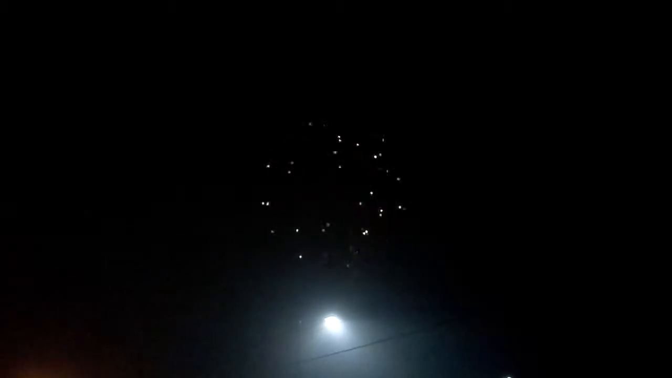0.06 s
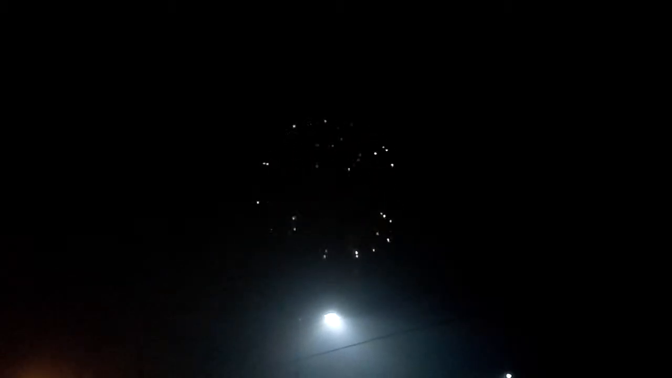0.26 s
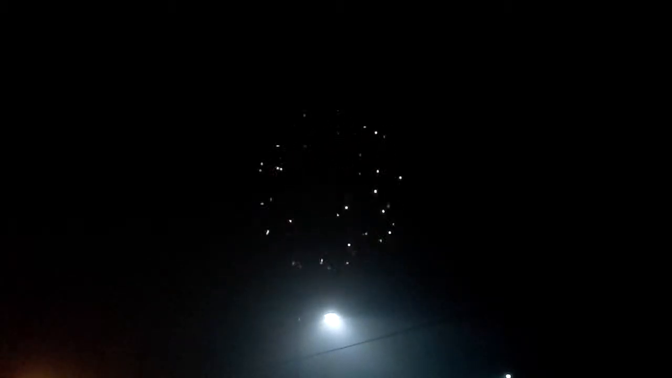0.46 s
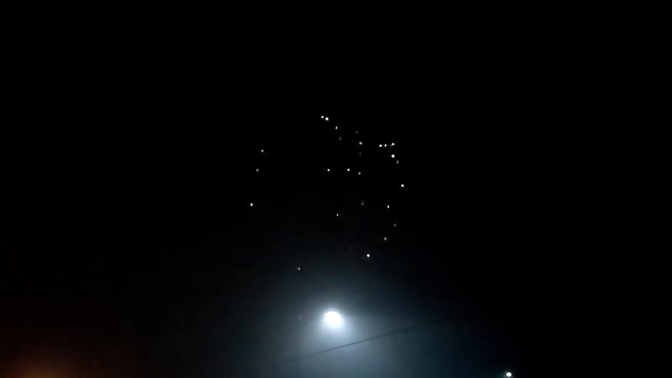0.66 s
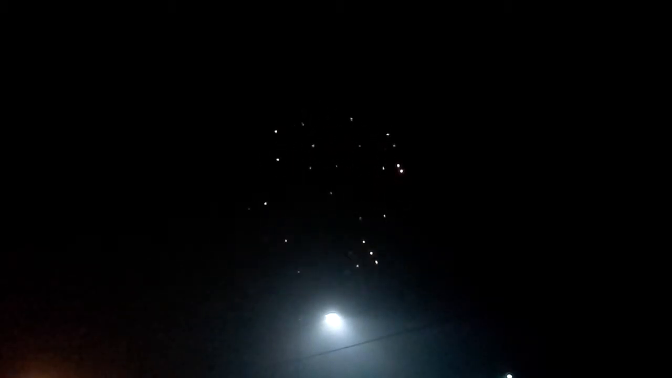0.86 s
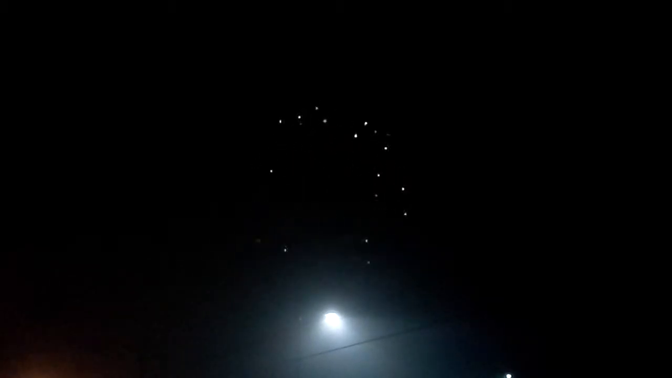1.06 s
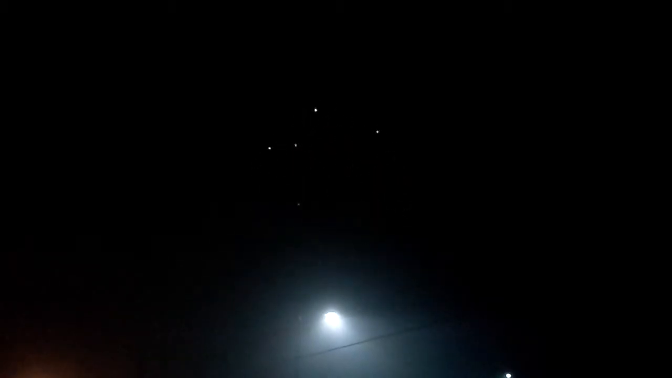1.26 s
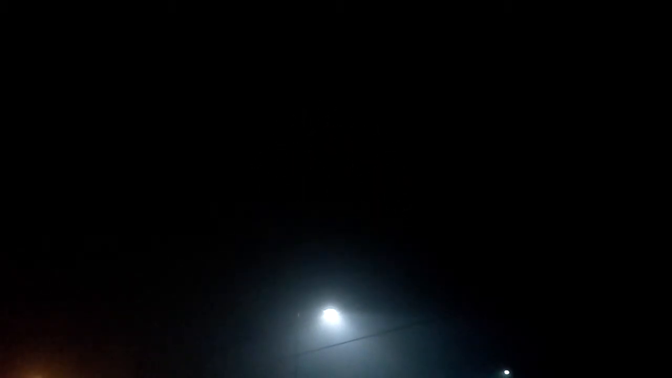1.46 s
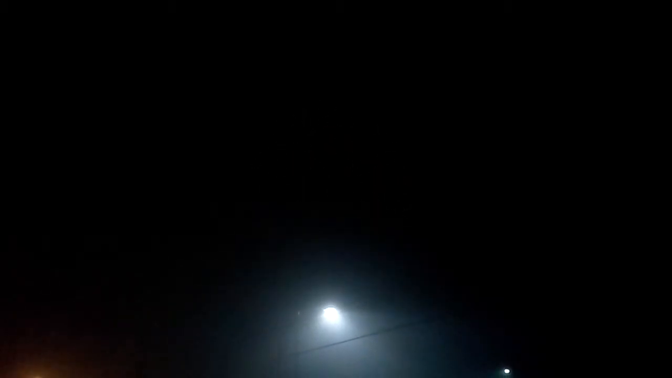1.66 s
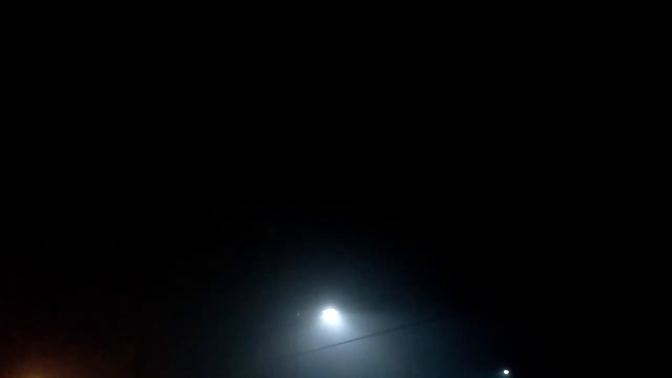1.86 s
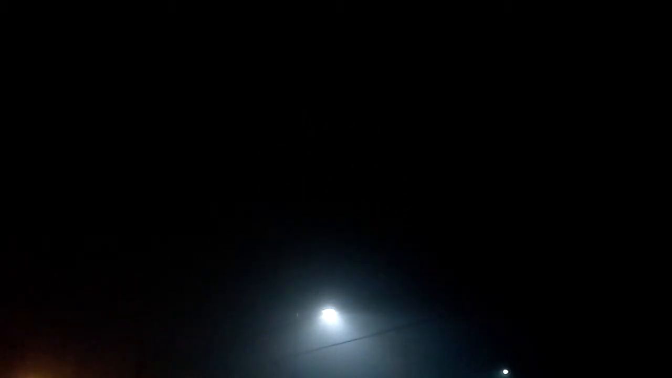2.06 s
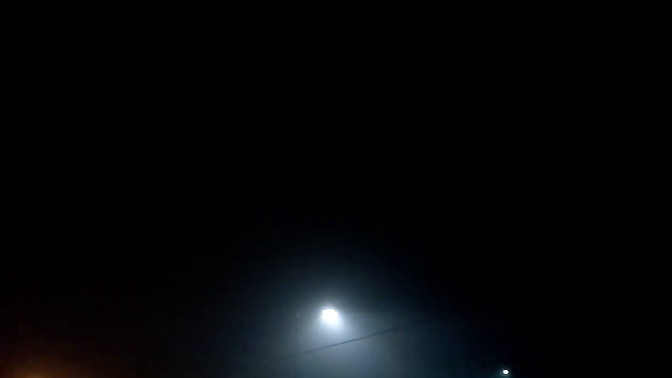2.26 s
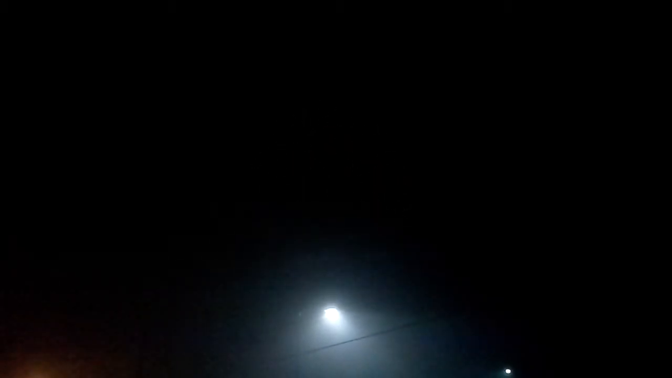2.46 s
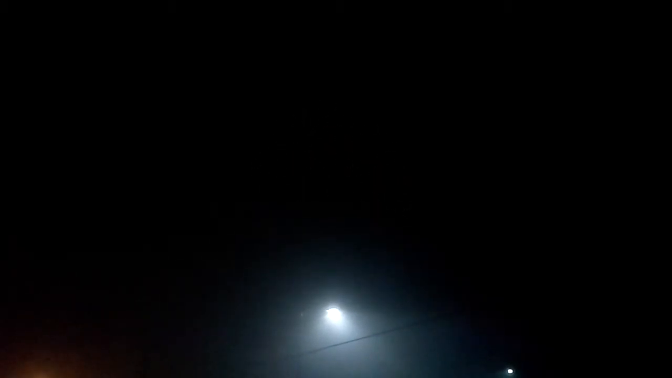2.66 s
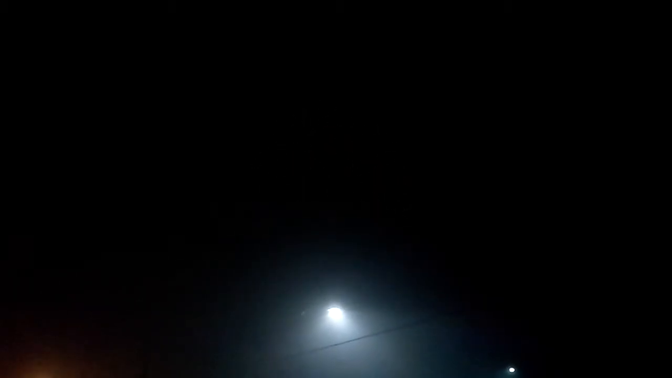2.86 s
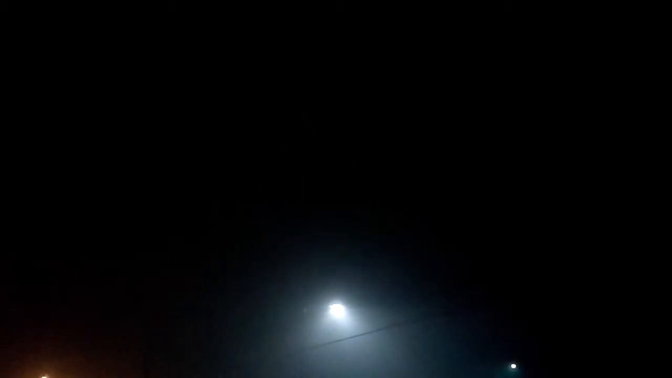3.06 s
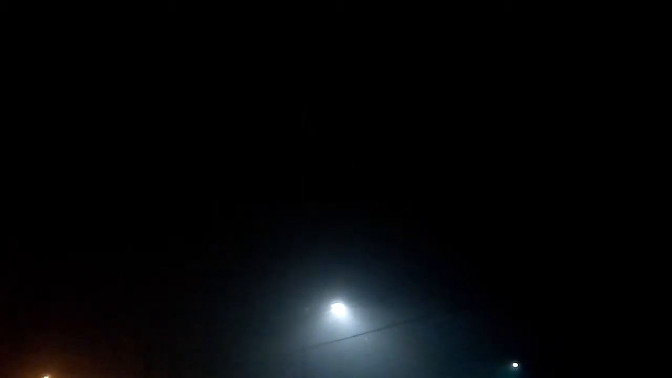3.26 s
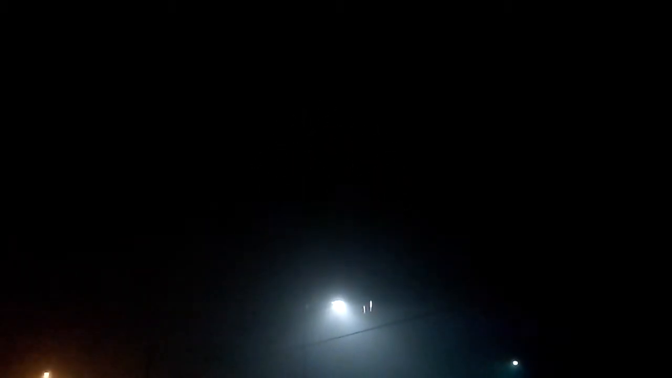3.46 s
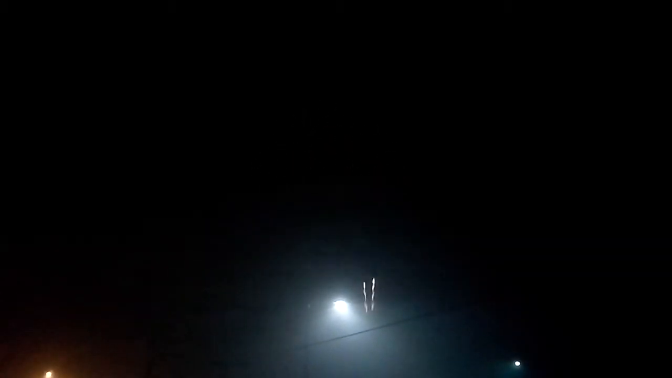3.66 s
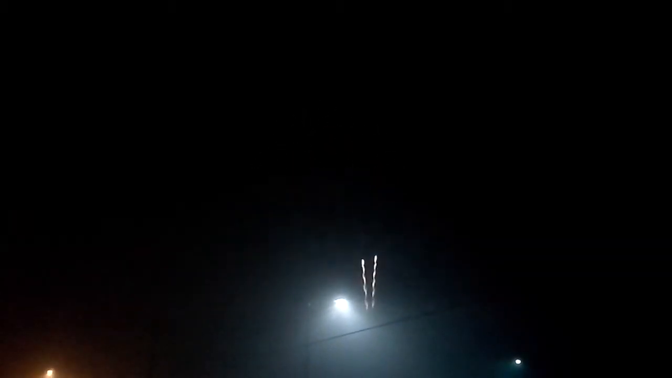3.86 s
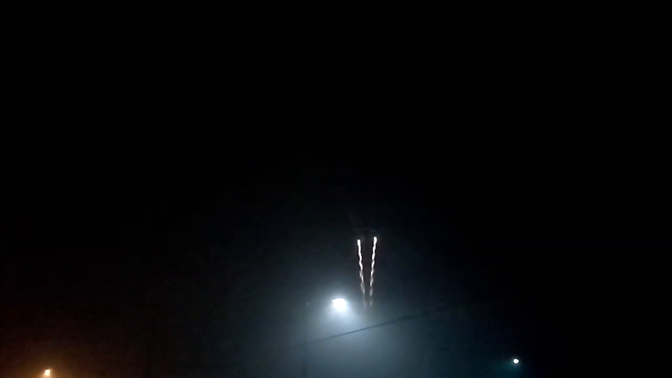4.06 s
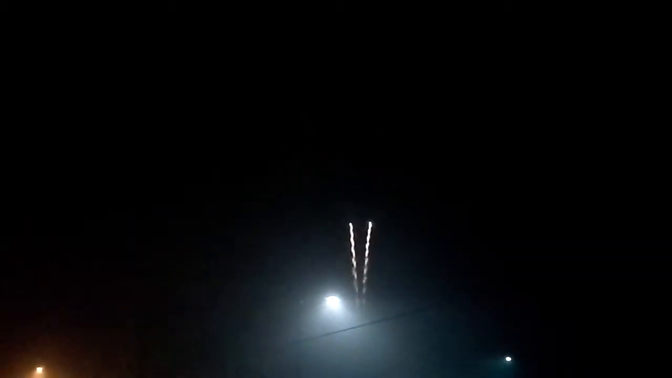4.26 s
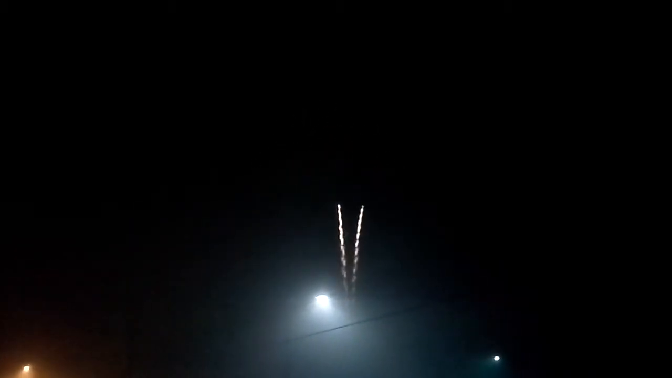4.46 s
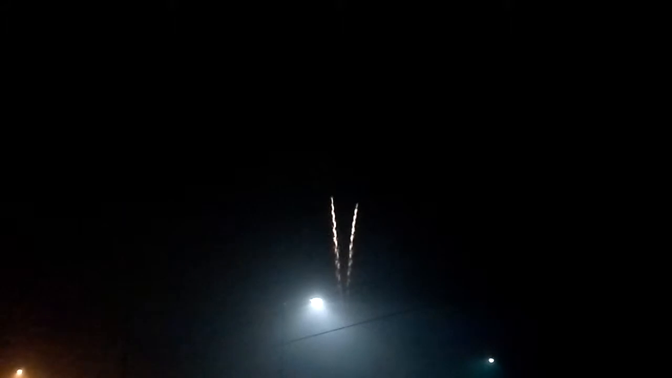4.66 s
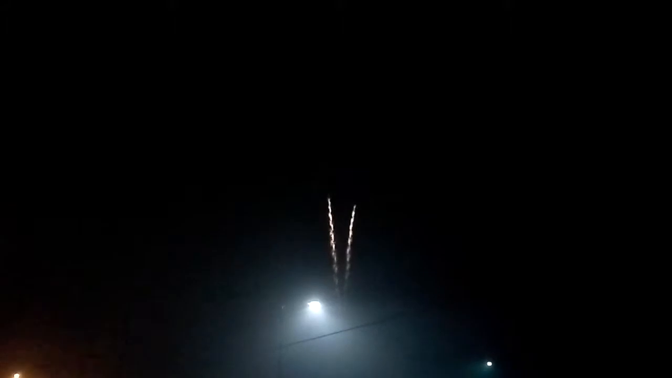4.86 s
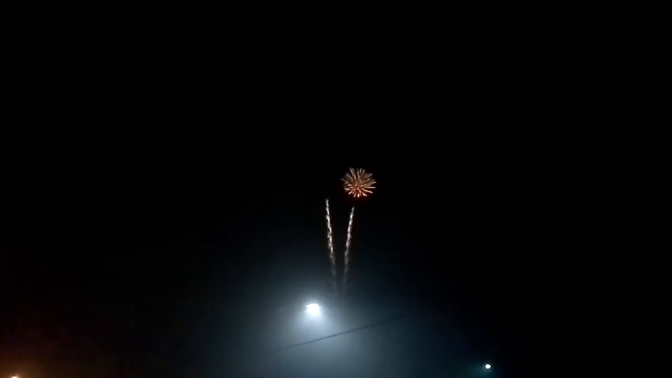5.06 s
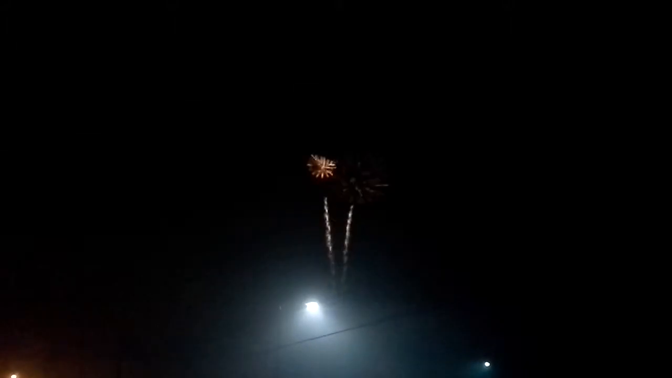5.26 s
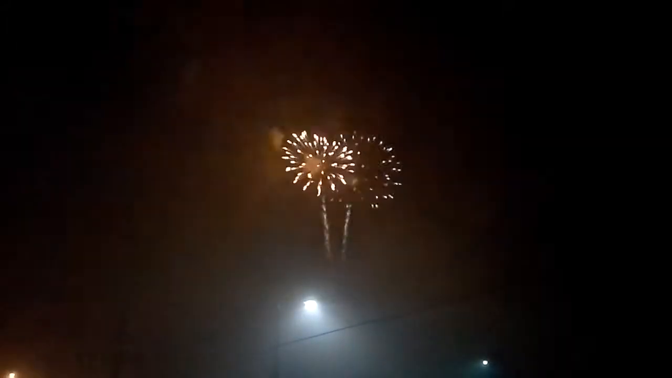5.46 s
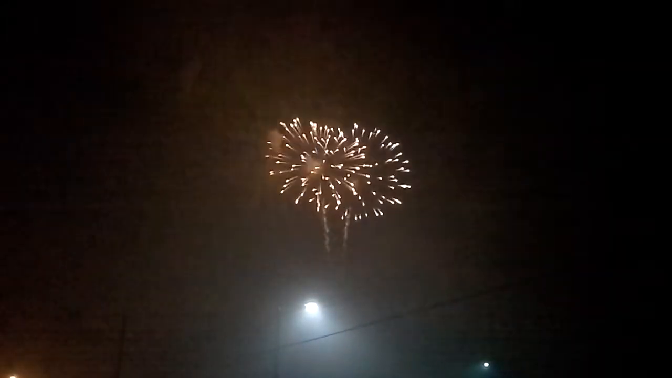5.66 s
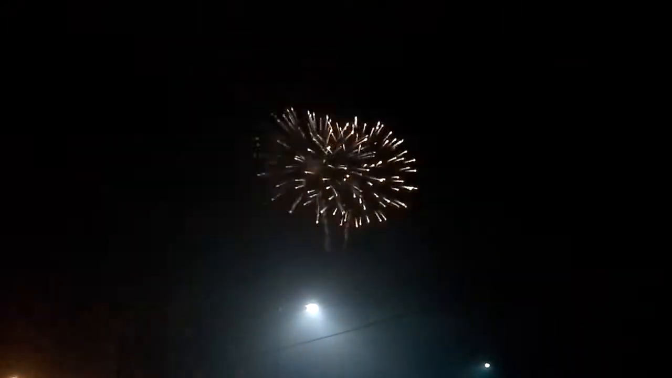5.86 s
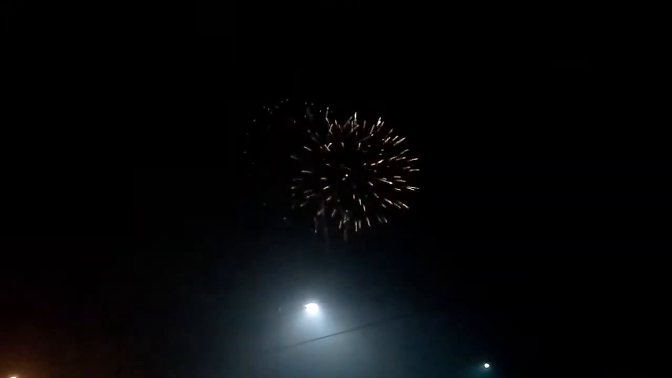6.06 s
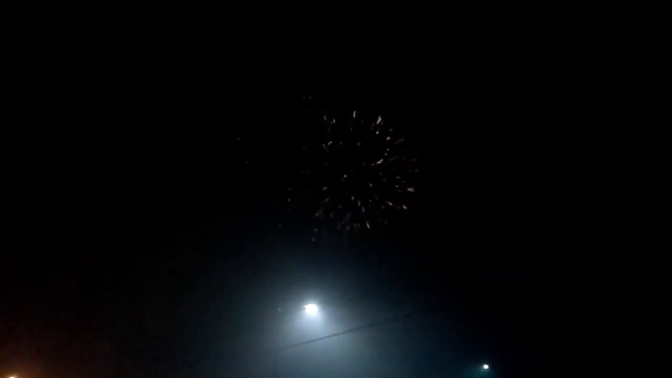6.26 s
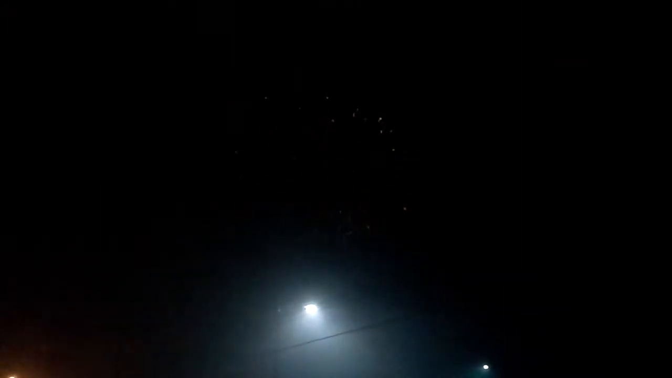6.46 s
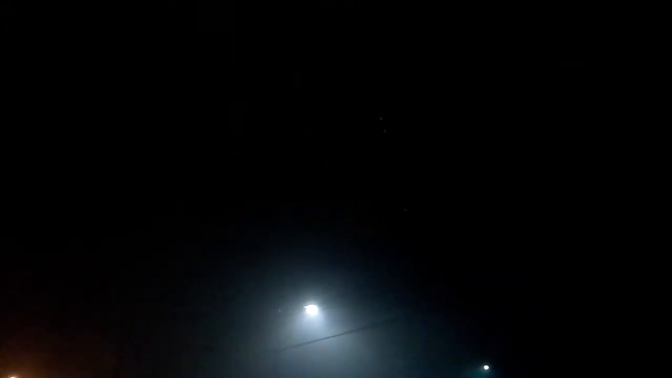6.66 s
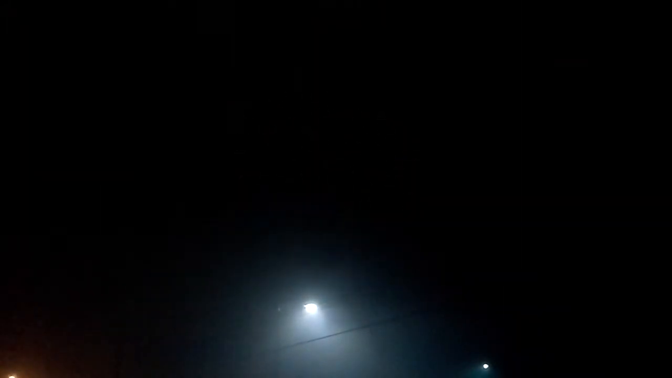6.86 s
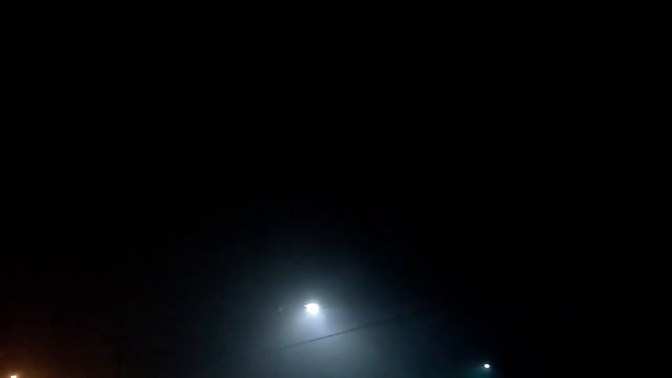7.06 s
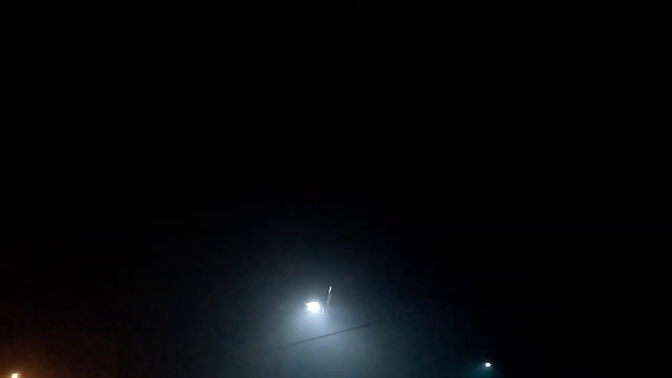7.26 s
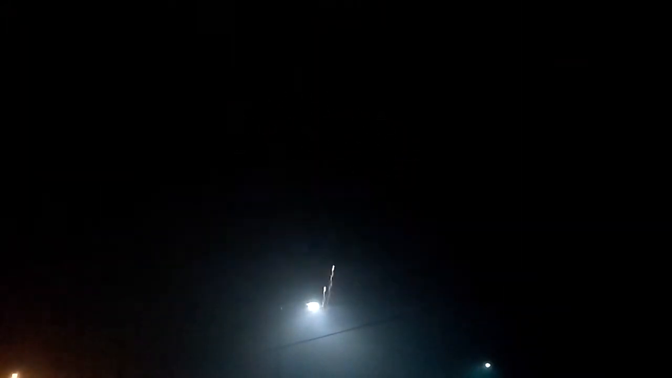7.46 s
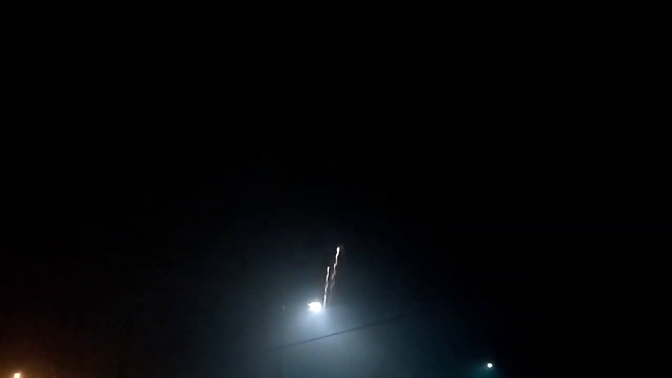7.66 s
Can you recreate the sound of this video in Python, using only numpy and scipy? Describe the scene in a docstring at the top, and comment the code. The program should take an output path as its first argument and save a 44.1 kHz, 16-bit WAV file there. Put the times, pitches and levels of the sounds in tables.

```python
"""Fireworks at night over houses, loud enough to overload one small microphone.
An earlier shell's glitter sizzles out among far shells' booms. Mortars (launch tubes) thump and ring
as their charges fire, and two shells burst overhead, each with a sharp jump in air pressure.
Houses scatter each bang, buildings slap it back, and the echoes roll on far away.
In the lulls, crickets and katydids sing by rubbing their wings."""
import sys
import numpy as np
from scipy import signal
from scipy.fft import rfft, irfft, next_fast_len
from scipy.io import wavfile
from scipy.ndimage import uniform_filter1d

SR = 44100
rng = np.random.default_rng(int(sys.argv[2]) if len(sys.argv) > 2 else 0)


def int16_out(signal):
    """Quantize to a 16-bit WAV file."""
    q = np.round(np.clip(np.atleast_2d(signal).T, -1, 1) * 32767)
    wavfile.write(sys.argv[1], SR, q.astype(np.int16))


N = 340011
TIME = np.arange(N) / SR

# Shells bursting: t/s, blast/dB, scatter off near houses/dB, echo tail/dB, factor on the tail's length
BURSTS = [(5.7196, 20.5, -8.5, -14, 1.69), (5.981, 20.5, -8, -8.5, 0.63)]
# Notes that hang between houses: f/Hz, level over the tail/dB, t60/s (the time to fade by 60 dB)
HOUSE_TONES = [(217, -2, 0.68), (279, -8.5, 0.63), (367, -7, 0.61)]
# Mortars firing: t/s, pulse/dB, pulse width/ms, share kept per bounce, hollow ring/dB, bright ring/dB,
# thump/dB, leak/dB, wall delay/s, wall echo/dB, scatter/dB, echo tail/dB,
# low overtone/Hz, its level/dB, high overtone/Hz, its level/dB, whistle/Hz, its level/dB
LAUNCHES = [(3.4197, -5, 0.14, 0.6, -5, -12, -10, -7.5, 0.013, -5, -11, -15.5, 1550, -31, 2270, -12, 4730, -17),
            (7.0806, -3.5, .14, 0.23, -9.5, -48, -12, -24, .0175, -11, -12.5, -20.5, 1650, -17, 2370, -17, 4300, -23),
            (7.1703, -3, 0.21, 0.8, -3.5, -45, -12.5, -12, .0055, -15, -13, -25.5, 1430, -16, 2290, -14, 4520, -15.5),
            (7.6272, -0.5, 0.15, 0.084, -40, -46, -11, -18, 0.0095, -2.5, -17, -25.5, 1380, -12.5, 2380, -17, 4590, -17)]
# Smeared echoes off buildings: delay/s, level/dB, f/Hz, width/octaves, t60/s
BURST_SLAPS = [(0.027, -18.5, 4630, 0.2, 0.09), (.028, -16, 794, 0.52, 0.078), (.035, -18, 265, 0.12, 0.32),
               (.095, -23, 4530, 0.11, 0.48), (.14, -27, 4650, .09, .2), (.79, -29, 627, 0.091, .19)]
LAUNCH_SLAPS = [(.085, -26.5, 864, 0.12, 1.5), (.224, -23.5, 135, 0.3, 0.13), (.366, -29.5, 810, 0.27, 0.8),
                (0.379, -28, 3400, .05, 0.043), (0.634, -31, 1900, 0.4, .11), (0.705, -18, 1650, .2, .035),
                (.719, -17, 1650, 0.19, 0.041)]  # levels count from the launch's pulse
# Flat walls that send a burst back as a knock: delay/s, level/dB, f/Hz, half length/s
WALL_KNOCKS = [(0.057, -16, 295, 0.019), (.08, -12, 225, 0.0061), (0.164, -11.5, 383, 0.0049),
               (.197, -14.5, 227, .012), (.251, -13, 255, .011), (0.289, -16, 216, 0.0094)]
# Booms and pops of far shells, and lone echoes of the launches and bursts:
# t/s, level/dB, f/Hz, t60 of the grumble/s
BOOMS_AND_ECHOES = [(.001, -8.5, 300, 0.064), (.002, -11.5, 755, .15), (0.042, -21, 1490, 0.082),
                    (0.099, -22, 115, .1), (.238, -13.5, 128, .1), (.399, -14, 310, 0.063),
                    (0.485, -23, 280, 0.18), (.505, -18.5, 790, 0.15), (0.653, -10.5, 125, 0.23),
                    (.656, -18, 424, 0.42), (.73, -24, 700, 0.28), (0.761, -17, 130, .08),
                    (.925, -18.5, 112, 0.062), (2.372, -15, 281, 0.065), (2.752, -16.5, 286, 0.053),
                    (3.04, -17.5, 264, 0.065), (3.436, -16.5, 137, .15), (3.665, -26.5, 1150, 0.51),
                    (3.78, -29, 3300, 0.49), (3.805, -24, 740, 0.2), (6.333, -15, 270, 0.22),
                    (6.52, -18, 248, 0.21), (6.865, -20, 285, 0.68), (7.035, -16.5, 280, 0.23),
                    (7.159, -15, 260, 0.27), (7.375, -13.5, 290, .09)]
# How long echoes last at each pitch, before each bang's own length factor: f/Hz, t60/s
STREET_DECAY = [(80, 1.75), (230, 1.94), (700, 0.92), (2000, 1), (4600, 1.44), (9000, 0.91), (15000, 0.3)]
ROLL_DECAY = [(80, 18), (170, 19), (280, 16.1), (450, 12.7), (800, 12.4), (1800, 7.35), (4500, 7.1)]
# The tone of each noise, from bass to treble: f/Hz, relative level/dB
BURST_SPECTRUM = [(45, -53), (100, -24), (160, -5), (215, -4.5), (295, -3), (480, -14), (630, -6.5),
                  (850, -10.5), (1200, -15), (3100, -22), (3900, -21), (4600, -16), (5400, -23.5),
                  (6300, -28), (9000, -36.5), (12500, -40), (15000, -61)]
LAUNCH_SPECTRUM = [(40, -39), (140, -4.5), (330, -14), (480, -10), (750, 1), (920, -4.5), (1130, -4),
                   (1300, -12), (1600, -5), (1950, -14), (2350, -7), (3300, -22.5), (3800, -16.5),
                   (4600, -15), (5500, -23), (8000, -43), (14000, -101)]
RUMBLE_SPECTRUM = [(25, -40), (45, -27), (70, -5), (135, 1.5), (205, 1.5), (280, 7.5), (330, 3), (400, -16),
                   (600, -77)]
ROAR_SPECTRUM = [(200, -28.5), (400, -1), (520, -3.5), (700, 0), (880, -1.5), (1100, -5), (1300, -7),
                 (1700, -5), (2000, -9), (2400, -9), (3200, -17), (4500, -9.5), (5500, -21), (7000, -31.5),
                 (9500, -73), (15000, -88)]
GLITTER_SPECTRUM = [(200, -32), (450, 1), (800, 1), (1200, -1), (1800, 1.5), (2400, -3), (3300, -5.5),
                    (4500, 2), (5600, -11), (7000, -18.5), (8200, -29), (9500, -71)]
RASP_SPECTRUM = [(3000, -18), (3800, -18), (4100, -7), (4300, -5.5), (4470, -2.5), (4560, -10), (4660, 1.5),
                 (4880, -14), (5100, -10), (5400, -19), (7000, -44), (10000, -68)]
AIR_SPECTRUM = [(40, -24), (150, 21), (500, -12), (2000, 7.5), (4500, 3), (6600, 0.5), (7800, -5),
                (9000, 1.5), (10000, -9), (14500, -6.5), (15500, -32)]
# Phrases of the nearest katydids: t/s, number of syllables, rasp/dB, wing note/Hz, its level/dB
KATYDID_PHRASES = [(.94, 3, -44, 4480, -48), (1.485, 4, -50, 4670, -49), (2.135, 3, -45, 4460, -46.5),
                   (3.03, 3, -46, 4700, -54), (3.25, 2, -43, 4730, -47), (4.19, 3, -44.5, 4480, -51),
                   (4.85, 1, -54, 4660, -54), (5.05, 4, -47.5, 3930, -52), (5.34, 2, -48, 4650, -51),
                   (5.555, 1, -45, 4470, -49)]
# Far crickets singing together: f/Hz, width/octaves, level/dB
CRICKET_CHORUS = [(5770, 0.037, -48.5), (4620, 0.1, -56), (2680, 0.066, -54.5)]
# The rolling echo of each kind of bang: rumble/dB, roar/dB, factor on its length
EARLIER_ROLL, SHELL_ROLL, MORTAR_ROLL = (-22, -20.5, 0.99), (-31.5, -28, 1), (-36.5, -30.5, 0.47)


def shells(mic_ring_hz=256):
    """A burst's shock hits with a short, deep ring in the overloaded microphone; the houses echo it."""
    out, t = np.zeros(N), TIME[:2 * SR]
    for start, blast_db, scatter_db, tail_db, stretch in BURSTS:
        # the shock, then its bounces off ground and wall
        crack = shock(t, 0.00072) + 0.51 * shock(t - .0015, 0.00069) + .5 * shock(t - .0027, 0.00019)
        mic_ring = -.55 * sine(t, mic_ring_hz) * np.exp(-(t / 0.0092) ** 4) * rise(t, 0.0041)
        tearing = 0.13 * noise(BURST_SPECTRUM, len(t), grain=0.58) * fade(t, 0.052)  # the case rips
        scatter = noise(BURST_SPECTRUM, len(t), grain=0.31) * fade(t, 0.17)
        notes = sum(amp(db) * sine(t, hz) * fade(t, t60) for hz, db, t60 in HOUSE_TONES)
        tail = street_echo(BURST_SPECTRUM, stretch, grain=0.64) + notes
        echoes = amp(scatter_db) * scatter + amp(tail_db) * tail
        add(out, start, amp(blast_db) * (crack + mic_ring + tearing) + echoes * rise(t, 0.00053))
    return out


def mortars(round_trip_s=0.001295):
    """The launch charge's pulse bounces up and down the tube and rings it; a wall and the street answer."""
    out, t = np.zeros(N), TIME[:2 * SR]
    trips = np.arange(12)[:, None]
    for (start, pulse_db, width_ms, bounce, ring_db, bright_db, thump_db, leak_db, wall_s, wall_db,
         scatter_db, tail_db, low_hz, low_db, high_hz, high_db, whistle_hz, whistle_db) in LAUNCHES:
        offset = (t - .0005 - trips * round_trip_s) / (width_ms / 1000)  # in pulse widths
        pulses = (bounce ** trips * -1.8 * offset * np.exp(-offset ** 2 / 2)).sum(0)
        hollow_ring = amp(ring_db) * sine(t, 1 / round_trip_s) * fade(t, 0.025)
        overtones = (amp(low_db) * sine(t, low_hz) + amp(high_db) * sine(t, high_hz)) * fade(t, 0.067)
        bright_ring = amp(bright_db) * sine(t, hz=2920) * fade(t, 0.062)
        thump = amp(thump_db) * knock(t - 0.0063, hz=113.5, half_s=0.004)
        bang = amp(pulse_db) * pulses + hollow_ring + thump
        scatter = noise(LAUNCH_SPECTRUM, len(t), grain=0.48) * fade(t, 0.12)
        tail = street_echo(LAUNCH_SPECTRUM, stretch=0.51, grain=0.11)
        echoes = amp(scatter_db) * scatter + amp(tail_db) * tail
        add(out, start, bang + overtones + bright_ring + echoes * rise(t, 0.0053))
        add(out, start + wall_s, amp(wall_db) * bang)
        # gas leaks past the shell just before it leaves, then whistles behind it
        add(out, start - 0.004, puff(leak_db, hz=1670, octaves=0.68, t60=0.026))
        add(out, start + 0.005, puff(whistle_db, whistle_hz, octaves=0.042, t60=0.043))
    return out


def street_echo(spectrum, stretch, grain):
    """Echoes off houses and trees come in uneven patches, each pitch dying at its own speed."""
    def gain(hz, t):
        return fade(t, stretch * look_up(STREET_DECAY, hz)) * amp(2.2 * patches(hz, t))
    return shape_over_time(noise(spectrum, 2 * SR, grain), gain)


def building_slaps():
    """The same buildings answer every burst and every launch after the same delays."""
    out = np.zeros(N)
    for start, *_ in BURSTS:
        for delay, *echo in BURST_SLAPS:
            add(out, start + delay, puff(*echo))
        for delay, db, hz, half_s in WALL_KNOCKS:
            add(out, start, amp(db) * knock(TIME[:SR] - delay, hz, half_s))
    for start, pulse_db, *_ in LAUNCHES:
        for delay, *echo in LAUNCH_SLAPS:
            add(out, start + delay, amp(pulse_db) * puff(*echo))
    return out


def booms_and_echoes(cycles=18):
    """Far shells, and lone echoes of the launches and bursts, arrive as short booms with a grumble."""
    out, t = np.zeros(N), TIME[:SR]
    for start, db, hz, t60 in BOOMS_AND_ECHOES:
        boom = sine(t, hz) * fade(t, cycles / hz)
        grumble = .5 * band(hz, 0.35, len(t)) * fade(t, t60)
        add(out, start, amp(db) * (boom + grumble) * rise(t, 1 / hz))
    return out


def rolling_echo():
    """Echoes arrive in lumps from ever farther away, and the air takes their treble."""
    rumble = shape_over_time(noise(RUMBLE_SPECTRUM, N), lambda hz, t: roll_gain(hz, t, 0))
    roar = shape_over_time(noise(ROAR_SPECTRUM, N, grain=0.68), lambda hz, t: roll_gain(hz, t, 1))
    return (rumble + roar) * amp(.9 * drift(16))


def roll_gain(hz, t, part, swell_s=0.17):
    """After each bang the rumble (part 0) or roar (part 1) swells and dies, the treble first."""
    bangs = [(-0.73, EARLIER_ROLL)]  # this shell burst before the scene begins
    bangs += [(start, SHELL_ROLL) for start, *_ in BURSTS]
    bangs += [(start, MORTAR_ROLL) for start, *_ in LAUNCHES]
    power = 0
    for start, (*levels_db, stretch) in bangs:
        age = np.maximum(t - start, 0)
        dying = fade(age, stretch * look_up(ROLL_DECAY, hz))
        power = power + (amp(levels_db[part]) * rise(age, swell_s) * dying) ** 2
    return np.sqrt(power)


def glitter(db=-34, hold_s=0.76):
    """Countless tiny snaps of burning stars merge into a sizzle that holds, then dies away."""
    burning = fade(np.maximum(TIME - hold_s, 0), t60=0.75)
    flicker_db = 1.5 * drift(33)
    return noise(GLITTER_SPECTRUM, N, grain=0.53) * burning * amp(db + flicker_db)


def tree_cricket(hz=2770, strokes_per_s=59.1, db=-46.5, slip_radians=1.56):
    """Each wing stroke is a short pure note that sags in pitch and starts out of step with the last."""
    strokes = np.cumsum(strokes_per_s * (1 + 0.0054 * drift(2.1))) / SR
    progress = strokes % 1
    start_phase = np.cumsum(slip_radians * rng.standard_normal(N))[strokes.astype(int)]
    pitch = hz * (1 - 0.059 * (progress - .5) + 0.0037 * drift(119))
    note = np.sin(2 * np.pi * np.cumsum(pitch) / SR + start_phase)
    trill = abs(np.sin(np.pi * progress)) ** 2.2 * note
    return unit(trill) * amp(db + 0.7 * drift(27))


def katydids(syllable_s=0.1116, far_db=-57):
    """Tiny wing teeth scrape out syllables, each a rasp around the wing's note; far ones blur together."""
    rasp_power, notes = amp(far_db + 3.4 * drift(23)) ** 2, 0
    for start, count, rasp_db, note_hz, note_db in KATYDID_PHRASES:
        beat = (TIME - start) / syllable_s
        stroke = abs(np.sin(np.pi * beat)) * ((beat > 0) & (beat < count))
        rasp_power += (amp(rasp_db) * stroke) ** 2
        notes += amp(note_db) * stroke * band(note_hz, octaves=0.015, size=N)
    return np.sqrt(rasp_power) * noise(RASP_SPECTRUM, N, grain=0.29) + notes


def night():
    """A far chorus of crickets over faint hiss."""
    chorus = sum(band(hz, octaves, N) * amp(db + 1.8 * drift(5)) for hz, octaves, db in CRICKET_CHORUS)
    return chorus + amp(-52) * noise(AIR_SPECTRUM, N)


def shock(t, length_s):
    """A blast wave: a jump in pressure, then suction."""
    age = np.maximum(t, 0) / length_s
    return (t > 0) * (1 - age) * np.exp(-age)


def knock(t, hz, half_s):
    """A rounded blast of a few cycles, centred on t = 0."""
    return np.cos(2 * np.pi * hz * t) * np.exp(-(t / half_s) ** 2)


def puff(db, hz, octaves, t60):
    """A short burst of noise in one band: a smeared echo or a jet of gas."""
    t = TIME[:SR]
    return amp(db) * band(hz, octaves, len(t)) * fade(t, t60) * rise(t, 0.003)


def noise(spectrum, size, grain=0.):
    """A dense crowd of tiny clicks with a given tone; grain makes a few stand out."""
    clicks = rng.standard_normal(size) * np.exp(grain * np.clip(rng.standard_normal(size), -3, 3))
    return colour(clicks, lambda hz: amp(look_up(spectrum, hz)))


def band(centre_hz, octaves, size):
    """Noise gathered around one pitch."""
    hiss = rng.standard_normal(size)
    return colour(hiss, lambda hz: np.exp(-(np.log2((hz + 1) / centre_hz) / octaves) ** 2 / 4))


def drift(per_s):
    """A smooth random wobble, up to about per_s swings a second."""
    return colour(rng.standard_normal(N), lambda hz: np.exp(-(hz / per_s) ** 2))


def patches(hz, t, width_hz=700, length_s=.02):
    """Random loud and soft patches over pitch and time."""
    field = rng.standard_normal((len(hz), len(t)))
    field = uniform_filter1d(field, size=round(width_hz / hz[1, 0]), axis=0)
    return unit(uniform_filter1d(field, size=round(length_s / t[1]), axis=1))


def colour(x, gain):
    """Turns each frequency up or down by gain(hz), then sets the average strength to 1."""
    size = next_fast_len(len(x))
    spectrum = rfft(x, size) * gain(np.fft.rfftfreq(size, 1 / SR))
    return unit(irfft(spectrum, size)[:len(x)])


def shape_over_time(x, gain):
    """Turns each frequency up or down from moment to moment by gain(hz, t)."""
    hz, t, slices = signal.stft(x, SR, nperseg=512)
    return signal.istft(slices * gain(hz[:, None], t), SR, nperseg=512)[1][:len(x)]


def look_up(table, hz):
    """Reads between a table's rows, with octaves evenly spaced."""
    f, value = np.transpose(table)
    return np.interp(np.log(hz + 1), np.log(f + 1), value)


def sine(t, hz):
    """A pure tone."""
    return np.sin(2 * np.pi * hz * t)


def rise(t, rise_s):
    """Swells from 0 towards 1."""
    return 1 - np.exp(-t / rise_s)


def fade(t, t60):
    """Dies away by 60 dB in t60 seconds."""
    return np.exp(-np.log(1000) * t / t60)


def amp(db):
    """Turns decibels into a multiplier."""
    return 10 ** (np.asarray(db) / 20)


def unit(x):
    """Sets the average strength (rms) to 1."""
    return x / np.sqrt(np.mean(x ** 2) + 1e-20)


def add(mix, start_s, sound):
    """Mixes a sound in at start_s."""
    part = mix[max(round(start_s * SR), 0):][:len(sound)]
    part += sound[:len(part)]


def scene():
    """One microphone hears it all, so both channels are alike."""
    bangs = shells() + mortars() + building_slaps() + booms_and_echoes()
    mono = bangs + rolling_echo() + glitter() + tree_cricket() + katydids() + night()
    return np.array([mono, mono])


def record(dry, top_hz=15600):
    """The overloaded microphone flattens the loudest peaks; then the highest treble is cut."""
    clipped = np.clip(dry, -1, 1)
    low_pass = signal.firwin(255, top_hz, window=("kaiser", 8), fs=SR)
    return signal.oaconvolve(clipped, low_pass[None], "same")


dry = scene()
out = record(dry)
int16_out(out)
```